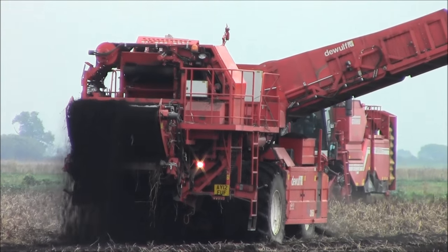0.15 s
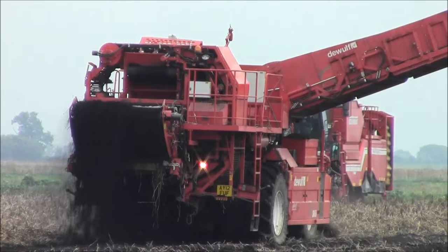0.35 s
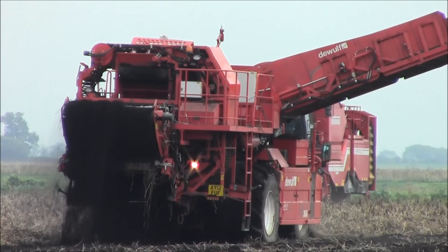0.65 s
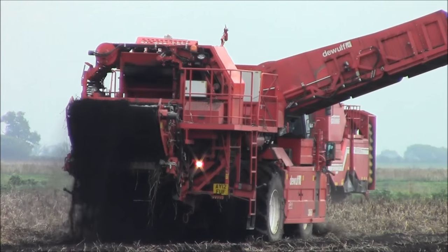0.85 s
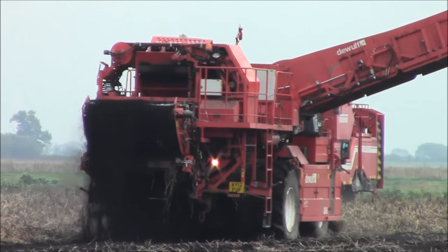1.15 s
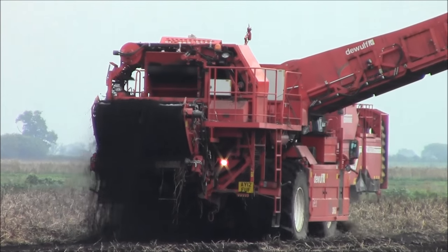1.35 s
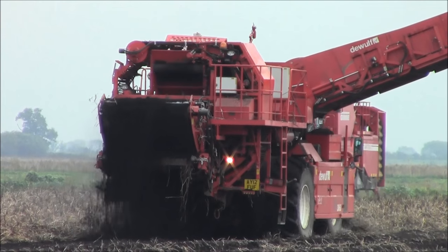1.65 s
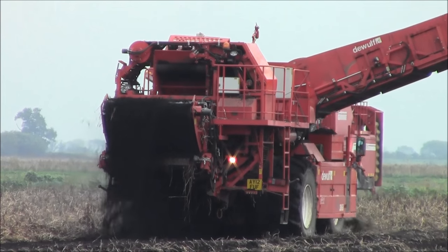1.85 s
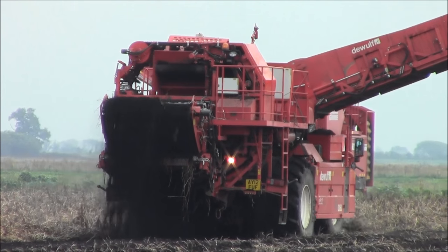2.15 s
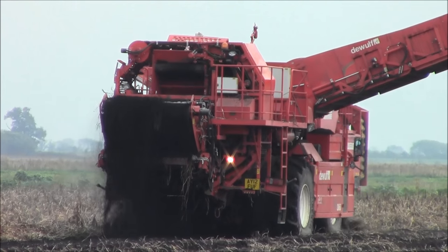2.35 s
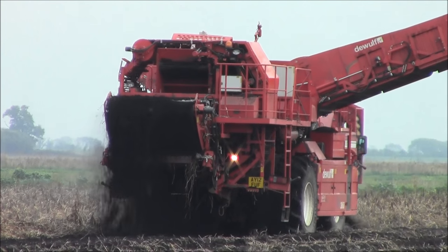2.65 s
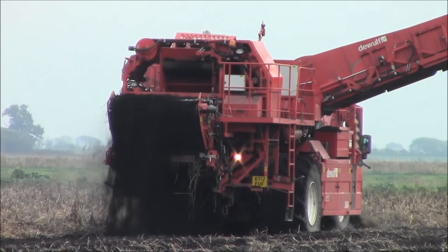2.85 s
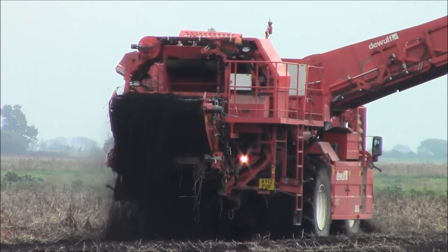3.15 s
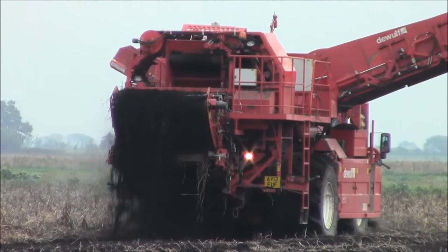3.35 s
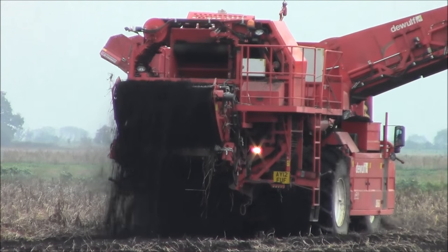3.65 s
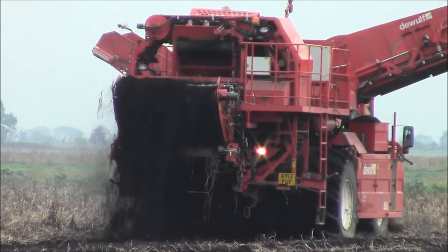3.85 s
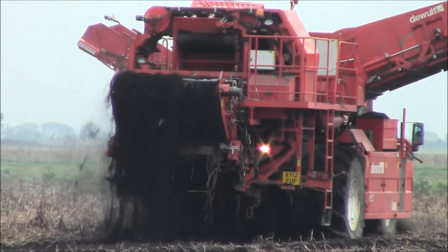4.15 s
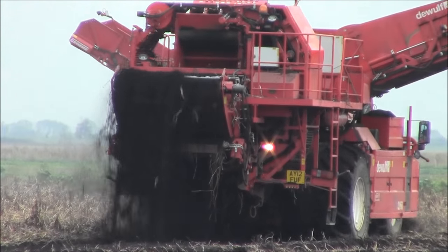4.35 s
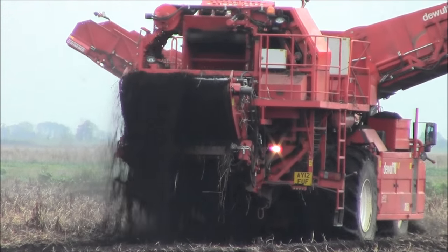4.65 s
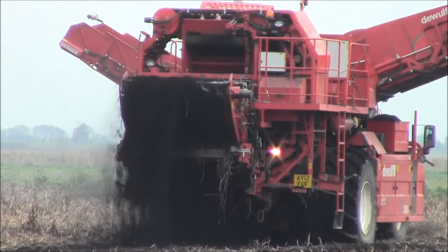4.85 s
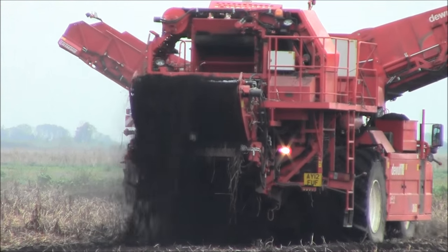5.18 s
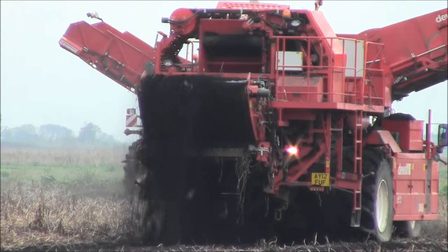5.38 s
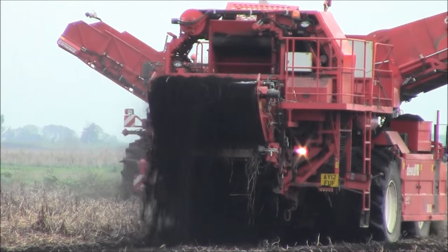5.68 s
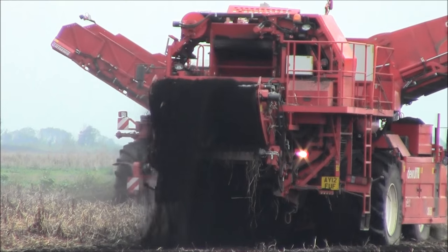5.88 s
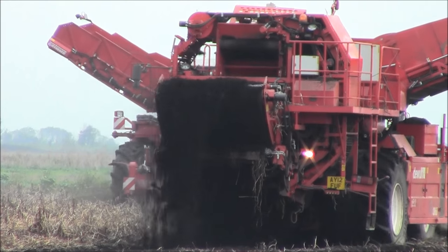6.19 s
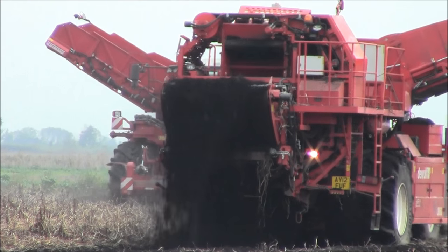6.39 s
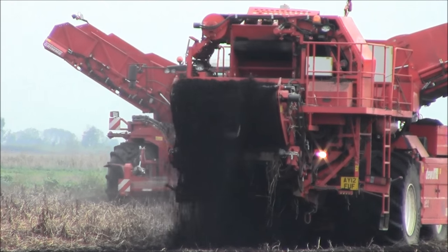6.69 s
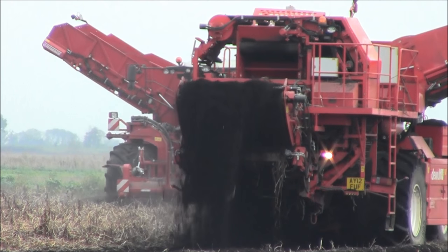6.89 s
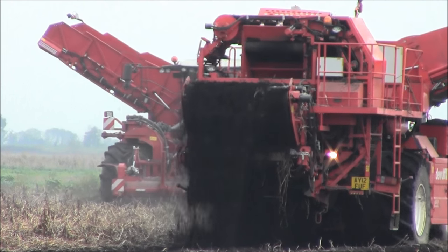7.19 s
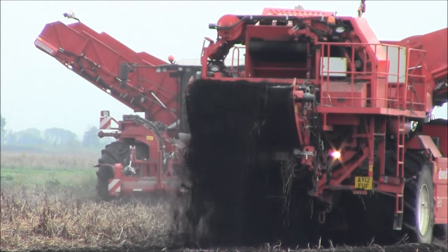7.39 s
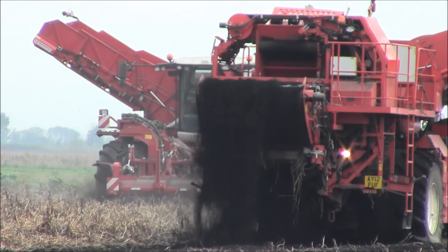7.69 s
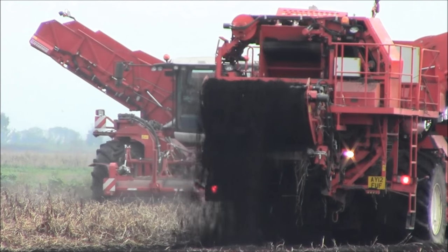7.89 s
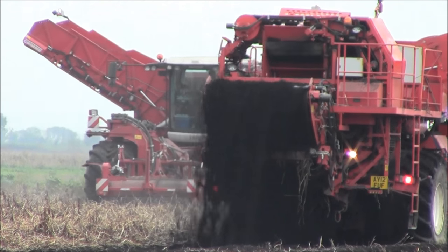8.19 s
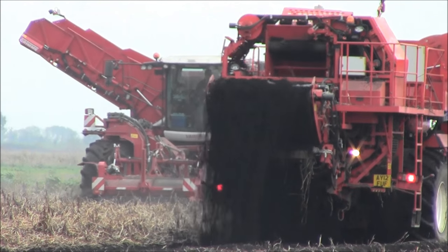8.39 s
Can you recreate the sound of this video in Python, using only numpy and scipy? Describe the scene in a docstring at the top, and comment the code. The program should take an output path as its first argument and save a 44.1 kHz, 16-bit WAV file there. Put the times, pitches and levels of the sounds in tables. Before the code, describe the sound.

Loud low diesel drone fluttering with a second engine, over dense metallic conveyor clatter and hissing soil; one sharp close click ducks everything late on.

```python
"""A field where two potato harvesters work, the near one crawling away. Its six-cylinder diesel drones as a stack
of sines and beats against the farther one; hydraulics and a shaft hum beneath. Shaped noise makes the exhaust
rumble, clattering sieve webs, a ringing steel panel, hissing soil and a squealing belt. Light ticks ring small
modes; one sharp click right at the microphone makes the limiter duck, and the level swells back at 2 dB per second.
Microphone hiss, a thin motor whine and a whistle lie under it all."""
import sys
import numpy as np
from scipy import signal
from scipy.fft import rfft, irfft, next_fast_len
from scipy.io import wavfile
from scipy.ndimage import uniform_filter1d

SR = 44100
rng = np.random.default_rng(int(sys.argv[2]) if len(sys.argv) > 2 else 0)


def waveform_to_disk(signal):
    """Save audio, clipped to [-1, 1], as 16-bit WAV at the path in sys.argv[1]."""
    frames = np.transpose(np.atleast_2d(signal))
    scaled = np.clip(frames, -1, 1) * 32767
    samples = np.round(scaled).astype(np.int16)
    wavfile.write(sys.argv[1], SR, samples)


N = 376173

# Stereo likeness of all coloured noise. Each row: frequency in Hz, left-right correlation from 0 to 1.
LIKENESS = [(30, 0.88), (90, 1), (200, 0.61), (400, 0.63), (900, 0.58), (1600, 0.765), (2400, 0.94),
            (3500, 0.86), (5000, 0.57), (8000, 0.51), (14000, 0.47)]

# Near diesel's firing tone and its partials. Each row: multiple of the firing rate, relative level in dB.
NEAR_ORDERS = [(1 / 2, -37.5), (2 / 3, -28), (1, 0), (4 / 3, -37), (3 / 2, -26.5), (2, -14), (5 / 2, -37),
               (3, -41.5)]
# A load pulls the near engine down. Each row: middle in seconds, length in seconds, sag in Hz.
ENGINE_LOAD = [(8.15, 1.145, 2.58)]
# The farther drone fades now and then. Each row: middle in seconds, length in seconds, depth in dB.
FAR_FADES = [(.3, .9, 4), (1.88, .5, 8), (2.6, 0.65, 8), (3.95, 1.2, 15), (5.73, 0.42, 10), (8.42, .7, 5)]
NEAR_HZ, NEAR_WAVER_HZ = 92.93, 0.11
NEAR_START_DB, RECEDE_DB_PER_S = -10, 0.2563
FAR_HZ, FAR_DB = 80.2, -26.5

# Colour of the exhaust rumble. Each row: frequency in Hz, relative level in dB.
RUMBLE_COLOUR = [(12, -18.5), (24, -17), (38, -5.5), (60, -4.5), (100, -1.5), (135, -3.5), (165, 2),
                 (200, 3), (240, -9.5), (285, -9), (320, -23.5), (450, -44), (1500, -79)]
# Its stereo lean. Each row: frequency in Hz, left minus right in dB.
RUMBLE_BALANCE = [(30, 1), (150, 2.9), (280, .3)]
RUMBLE_START_DB = -26

# Effort of the hydraulic drive, heard as its hum. Each row: time in seconds, level in dB.
DRIVE_EFFORT = [(0, -31.5), (.2, -31.5), (.5, -37), (1.2, -42), (1.65, -39), (2.1, -47.5), (3, -50),
                (4.1, -40.5), (5.3, -56), (7.3, -47), (8.53, -52)]
# Colour of the oil rush. Each row: frequency in Hz, relative level in dB.
OIL_COLOUR = [(150, -20.5), (260, -1), (400, -5.5), (700, -14.5), (1100, -6.5), (1500, -25), (5000, -60)]
DRIVE_START_HZ, DRIVE_CREEP_HZ_PER_S = 100.8, .3
# the overtone comes up under strain: dB at full effort, dB per dB of effort
OVERTONE_DB, OVERTONE_FOLLOWS = -37, 3.0

SHAFT_HZ, SHAFT_START_DB, SHAFT_FADE_DB_PER_S = 338.7, -47.5, 1.4

# Load on the sieve webs, heard as their clatter. Each row: time in seconds, level in dB.
WEB_LOAD = [(0, -33), (1.2, -35), (1.95, -33.5), (2.5, -35.5), (3.8, -35.6), (4.8, -34.5), (7, -35.2),
            (8.2, -33.5), (8.53, -33.5)]
# Colour of the clatter. Each row: frequency in Hz, relative level in dB.
CLATTER_COLOUR = [(200, -13), (340, -3.5), (480, 0.5), (680, -1), (870, 1), (1050, -2), (1220, -4),
                  (1450, -4.5), (1850, -4.5), (2110, -1), (2290, -11.5), (2600, -7.5), (4000, -43),
                  (9000, -49.5)]
# Its stereo lean. Each row: frequency in Hz, left minus right in dB.
CLATTER_BALANCE = [(300, 2.0), (800, 2.0), (1200, -1.0), (1850, -1.0), (2200, 1.0)]
# Colour of the ringing panel. Each row: frequency in Hz, relative level in dB.
PANEL_COLOUR = [(1250, -24.0), (1460, -7.5), (1550, -2.5), (1610, -3), (1690, -8.5), (1800, -21),
                (2400, -40), (6000, -80)]
# the panel rings with the clatter: mean dB, dB per dB of load
PANEL_DB, PANEL_FOLLOWS = -41.4, 1.2

# Flow of soil over the webs, heard as its hiss. Each row: time in seconds, level in dB.
SOIL_FLOW = [(0, -31.5), (.5, -35), (2.05, -35.5), (2.4, -34), (3.2, -33.8), (4.8, -35), (5.6, -38.5),
             (7, -37.5), (8.3, -35.5), (8.53, -35)]
# Colour of the hiss. Each row: frequency in Hz, relative level in dB.
SOIL_COLOUR = [(1800, -19.5), (2450, -7.5), (2750, -5.5), (3020, -.5), (3250, -2.5), (3650, -1), (3970, -1),
               (4300, -5), (4930, -7.5), (5400, -10.5), (5800, -17), (6300, -17.5), (7000, -27.5),
               (14000, -32)]
# Its stereo lean. Each row: frequency in Hz, left minus right in dB.
SOIL_BALANCE = [(2400, -1), (3300, -.5), (4100, -0.5), (4350, -4), (4750, -1), (5000, 0), (6000, 0.5)]

# Fits of belt rubbing. Each row: start in seconds, length in seconds, pitch in Hz, glide in Hz per second,
# level in dB.
RUBS = [(0, .2, 3960, -800, -33), (.2, 0.45, 3950, -400, -41.5), (.8, 0.28, 3910, 299, -39),
        (1.253, .2, 3950, 0, -39), (1.46, 0.18, 3480, 999, -39), (2.28, .2, 3600, 1200, -37),
        (2.999, 0.5, 4020, -200, -39), (3.42, 0.14, 3580, 0, -38), (4.028, 0.21, 3920, 0, -37.5),
        (4.2, 0.25, 3500, 0, -40), (4.5, 0.63, 3870, -50, -44.5), (8.18, 0.17, 3930, 0, -39)]
# Rasp pitched above the squeal. Each row: time in seconds, level in dB.
RASP = [(0, -41.5), (1.3, -42), (2.2, -43.5), (2.8, -52), (4.1, -50), (5.5, -59), (7.2, -53), (8.53, -46)]
RUB_ATTACK_S, RUB_RELEASE_S = 0.042, 0.13

# Colour of the microphone hiss. Each row: frequency in Hz, relative level in dB.
MIC_HISS_COLOUR = [(1000, -0.5), (6000, 9), (8000, 7), (10000, 3.5), (13000, 1.5), (16000, -10)]
# Thin whine of a small motor. Each row: pitch in Hz, level in dB, left minus right in dB.
MOTOR_WHINE = [(6610, -63, 8), (8600, -78, -1)]
# The whistle swells at times. Each row: middle in seconds, length in seconds, rise in dB.
WHISTLE_SWELLS = [(1.1, .6, 8), (2.1, .9, 12), (8.5, .5, 9)]
WHISTLE_HZ, WHISTLE_REST_DB = 8091, -73

# Light ticks and clanks. Each row: time in seconds, strength in dB before the trim, brightness in dB per octave.
TICKS = [(2.42, -28, 11), (2.70, -24, 11), (2.899, -18.5, 11), (2.902, -19, 10), (2.9213, -15.5, 9),
         (2.925, -17, 1), (4.5922, -13.5, -2), (4.6483, -20, 14), (4.773, -16, 1.5), (4.9525, -18, 0),
         (5.3525, -15, -2), (5.5725, -18, 2), (5.752, -18, 0), (6.0325, -15, 0), (6.293, -17, -2),
         (6.4725, -21, 0), (6.6527, -15.5, 0), (7.013, -11, -4), (7.075, -20.5, 0), (7.293, -17, -2),
         (8.2735, -20, 3)]
# Modes of the small part they ring. Each row: frequency in Hz, relative level in dB, 60 dB decay in seconds.
TICK_MODES = [(1750, 1, 0.01), (1980, 2, 0.0099), (2190, -1, 0.011), (2922.5, -11.5, 0.0054),
              (3350, -10, .007), (4150, -13, 0.0065)]
TICK_TRIM_DB = -3.5
# fainter ticks fall within this span, at least this strong before the trim
FAINT_FROM_S, FAINT_TO_S, FAINT_DB = 4.5, 7.8, -26

# Three contacts of the close click, two milliseconds in all. Each row: time in seconds, strength in dB
# before the trim, brightness in dB per octave.
CLICK_CONTACTS = [(6.4295, -5.5, 4), (6.4303, -11, -4), (6.4314, 1, -0.5)]
# Modes the click rings. Each row: frequency in Hz, relative level in dB, 60 dB decay in seconds.
CLICK_MODES = [(620, -19, .012), (870, -18, 0.019), (1601, -0.5, 0.016), (2120, -2, 0.0068),
               (2615, -4, 0.0078), (3020, -9, 0.011), (3750, -11.5, 0.0077), (4920, -4.5, 0.008),
               (5360, -11, 0.0062), (6530, -12.5, 0.0039), (9900, -32, 0.0025)]
CLICK_TRIM_DB = -3

CUTOFF_HZ = 15800


def seconds():
    """Time at every sample."""
    return np.arange(N) / SR


def from_db(db):
    """Decibels to gain."""
    return 10 ** (np.asarray(db) / 20)


def rms_one(x):
    """Scale to rms 1."""
    return x / np.sqrt(np.mean(x ** 2) + 1e-20)


def in_time(rows):
    """Each column of a curve at every sample."""
    s, *columns = np.transpose(rows)
    return [np.interp(seconds(), s, column) for column in columns]


def at_hz(points, hz):
    """Read a spectrum on a log-frequency axis."""
    point_hz, value = np.transpose(points)
    return np.interp(np.log(np.maximum(hz, 1)), np.log(point_hz), value)


def pan(balance_db):
    """Left and right gains for a level difference, positive to the left."""
    return from_db(np.array([[.5], [-.5]]) * balance_db)


def angle(per_s):
    """Angle in radians of something turning at this rate."""
    return 2 * np.pi * np.cumsum(per_s) / SR


def swells(rows):
    """Smooth bumps, each with a middle, a length and a height."""
    total = 0
    for middle, length, height in rows:
        phase = np.pi * np.clip((seconds() - middle) / length, -.5, .5)
        total = total + height * np.cos(phase) ** 2
    return total


def drift(rate):
    """Slow random wandering with spread 1; a higher rate in Hz wanders faster."""
    step = 40  # samples between the slow points
    r = np.exp(-2 * np.pi * rate * step / SR)
    noise = rng.standard_normal(N // step + 2002)
    slow = signal.lfilter([1], [1, -2 * r, r * r], noise)[2000:]  # drop the filter's start-up
    return np.interp(np.arange(N) / step, np.arange(len(slow)), rms_one(slow))


def coloured(spectrum, drive=1, balance=((1000, 0),), lag_s=0):
    """Stereo noise, swelling with the drive, in a given colour and width; the left may lag; rms 1."""
    size = next_fast_len(N)
    hz = np.arange(size // 2 + 1) * SR / size
    mid, side = rfft(rng.standard_normal((2, N)) * drive, size)
    alike = np.clip(at_hz(LIKENESS, hz), 0, 1)
    ears = np.sqrt(1 + alike) * mid + np.sqrt(1 - alike) * side * [[1], [-1]]
    ears[0] *= np.exp(-2j * np.pi * hz * lag_s)
    shaped = ears * from_db(at_hz(spectrum, hz)) * pan(at_hz(balance, hz))
    return rms_one(irfft(shaped, size)[:, :N])


def knocks(per_s, spread_db, fade_s):
    """Amplitude envelope of many small random collisions, each with decaying power; rms 1."""
    strength = from_db(spread_db * np.clip(rng.standard_normal(N), -2, 2))
    power = (rng.random(N) < per_s / SR) * strength ** 2
    return rms_one(np.sqrt(signal.lfilter([1], [1, -np.exp(-1 / (fade_s * SR))], power + 1e-12)))


def squeal(hz, width_hz):
    """A narrow, restless band of sound that follows a pitch; rms 1."""
    lowpass = signal.butter(2, width_hz / 2, fs=SR, output="sos")
    narrow = signal.sosfilt(lowpass, rng.standard_normal((2, N)))
    turn = angle(hz)
    return rms_one(narrow[0] * np.cos(turn) + narrow[1] * np.sin(turn))


def diesels(firing, near_db):
    """The silencers leave nearly pure firing tones; the two engines beat nearly thirteen times a second."""
    near = 0
    for order, order_db in NEAR_ORDERS:
        waver_db = .12 if order == 1 else .8
        near = near + from_db(order_db + waver_db * drift(3.6)) * np.cos(order * firing)
    far_turn = angle(FAR_HZ + 0.15 * drift(1.7))
    far = from_db(FAR_DB - swells(FAR_FADES)) * np.cos(far_turn)
    return np.sqrt(2) * (from_db(near_db) * near + far) * pan(2.04)


def exhaust_rumble(receding_db):
    """Low turbulent noise from the exhaust, sinking as the machine crawls away."""
    level_db = RUMBLE_START_DB + receding_db + .5 * drift(2.8)
    return from_db(level_db) * coloured(RUMBLE_COLOUR, balance=RUMBLE_BALANCE)


def hydraulics():
    """The third and fourth harmonics of the drive hum over its oil rush; all three follow its effort."""
    effort_db, = in_time(DRIVE_EFFORT)
    overtone_db = OVERTONE_DB + OVERTONE_FOLLOWS * (effort_db - effort_db.max())
    drive_hz = DRIVE_START_HZ + DRIVE_CREEP_HZ_PER_S * seconds()
    turn = angle(drive_hz * (1 + 0.0015 * drift(3.4)))
    hum = from_db(effort_db) * np.cos(3 * turn) + from_db(overtone_db) * np.cos(4 * turn)
    rush = from_db(effort_db / 2 - 21.5) * coloured(OIL_COLOUR)
    return np.sqrt(2) * hum * from_db(0.97 * drift(2.6)) * pan(1.0) + rush


def shaft():
    """A faint turning-shaft hum, a wavering sine that fades with distance."""
    level_db = SHAFT_START_DB - SHAFT_FADE_DB_PER_S * seconds() + 1.1 * drift(1.2)
    return np.sqrt(2) * from_db(level_db) * np.sin(angle(SHAFT_HZ + 1.213 * drift(0.58)))


def webs():
    """Rods and clods knock densely on the sieve webs and keep a steel panel ringing and singing."""
    clatter_db = in_time(WEB_LOAD)[0] + .3 * drift(2.3)
    panel_db = PANEL_DB + PANEL_FOLLOWS * (clatter_db - clatter_db.mean()) + .5 * drift(3.0)
    web_knocks = knocks(per_s=2000, spread_db=1, fade_s=0.0041)
    rattle = coloured(CLATTER_COLOUR, drive=web_knocks, balance=CLATTER_BALANCE, lag_s=.00005)
    panel_knocks = knocks(per_s=700, spread_db=3.0, fade_s=0.0033)
    panel = coloured(PANEL_COLOUR, drive=panel_knocks)
    song = squeal(1595 + 22 * drift(6.95), width_hz=80)
    ringing = panel + from_db(-5.5) * song
    return from_db(clatter_db) * rattle + from_db(panel_db) * ringing * pan(-9)


def soil(firing):
    """Soil and haulm hiss over the steel, mixed with engine clatter that pulses with the firing."""
    hiss_db = in_time(SOIL_FLOW)[0] + .5 * drift(8.6)
    pulse = 1 + 0.095 * np.cos(firing) + 0.062 * np.cos(firing / 2)
    grains = knocks(per_s=3500, spread_db=3.0, fade_s=0.0024)
    hiss = coloured(SOIL_COLOUR, drive=pulse * grains, balance=SOIL_BALANCE, lag_s=.000015)
    return from_db(hiss_db) * hiss


def belt():
    """Rubbing comes in fits: a rough, sliding squeal with a broader rasp above it, further to the right."""
    t, tone = seconds(), 0
    waver_hz = 25 * drift(8)
    for start, length, hz, glide, level_db in RUBS:
        attack = (t - start) / RUB_ATTACK_S
        release = (start + length - t) / RUB_RELEASE_S + .5  # half let go at the end of the fit
        grip = np.clip(np.minimum(attack, release), 0, 1)
        pitch = hz + glide * np.clip(t - start, 0, length) + waver_hz
        tone = tone + from_db(level_db) * grip * squeal(pitch, width_hz=340)
    rasp_db = in_time(RASP)[0] + 1.9 * drift(12)
    rasp = from_db(rasp_db) * squeal(4820 + 110 * drift(5), width_hz=540)
    return tone * from_db(1.9 * drift(14)) * pan(-1.5) + rasp * pan(-2.5)


def microphone_hiss():
    """Steady electrical noise of the microphone."""
    return from_db(-51.5) * coloured(MIC_HISS_COLOUR)


def motor_whine():
    """A small motor's thin whine: high sines, wavering a little in pitch and level."""
    whine = 0
    for hz, level_db, balance_db in MOTOR_WHINE:
        tone = np.sin(angle(hz + 1.5 * drift(10)))
        whine = whine + from_db(level_db + drift(2)) * tone * pan(balance_db)
    return np.sqrt(2) * whine


def whistle():
    """A thin high sine that swells at times."""
    level_db = WHISTLE_REST_DB + swells(WHISTLE_SWELLS) + 2.0 * drift(6)
    return np.sqrt(2) * from_db(level_db) * np.sin(angle(WHISTLE_HZ + 2.0 * drift(10))) * pan(-3.5)


def ring(clicks, hz, t60):
    """A unit click sets a decaying sine ringing from height 1."""
    r, w = from_db(-60 / (t60 * SR)), 2 * np.pi * hz / SR
    return signal.lfilter([0, np.sin(w)], [1, -2 * r * np.cos(w), r * r], clicks + 1e-18)


def strike(hits, modes, vary_db):
    """Every hit rings each mode with a strength of its own; bright hits favour the modes above 2 kHz."""
    s, hit_db, bright_db = np.transpose(hits)
    chance, out = rng.standard_normal((len(hits), len(modes))), np.zeros(N)
    for k, (hz, mode_db, t60) in enumerate(modes):
        clicks = np.zeros(N)
        tilt_db = bright_db * np.log2(hz / 2000)
        clicks[(s * SR).astype(int)] = from_db(hit_db + mode_db + tilt_db + vary_db * chance[:, k])
        out += ring(clicks, hz, t60) * (-1) ** k  # neighbouring modes start in opposite directions
    return out


def ticking():
    """The clear ticks and a scatter of faint ones ring the same small part."""
    faint = []
    for when, force in rng.random(size=(14, 2)):
        faint.append((FAINT_FROM_S + when * (FAINT_TO_S - FAINT_FROM_S), FAINT_DB + 4 * force, 0))
    return from_db(TICK_TRIM_DB) * strike(TICKS + faint, TICK_MODES, vary_db=1.5) * pan(-1.3)


def close_click():
    """Three quick hard contacts right at the microphone ring a set of short modes."""
    return from_db(CLICK_TRIM_DB) * strike(CLICK_CONTACTS, CLICK_MODES, vary_db=1.7) * pan(0.97)


def scene():
    """Engines, machinery, ticks, the close click and the thin sounds beneath."""
    receding_db = -RECEDE_DB_PER_S * seconds()
    firing = angle(NEAR_HZ + NEAR_WAVER_HZ * drift(1.23) - swells(ENGINE_LOAD))
    engines = diesels(firing, NEAR_START_DB + receding_db) + exhaust_rumble(receding_db)
    drone = engines + hydraulics() + shaft()
    digging = webs() + soil(firing) + belt()
    thin = microphone_hiss() + motor_whine() + whistle()
    return drone + digging + thin + ticking() + close_click()


def limiter(x, ceiling_db, most_db, release_db_per_s, ahead_s):
    """Looks ahead, ducks under a peak and recovers slowly."""
    level_db = 20 * np.log10(np.abs(x).max(axis=0) + 1e-9)
    over = np.clip(level_db - ceiling_db, 0, most_db)
    ramp = release_db_per_s * seconds()
    held = np.maximum.accumulate(over + ramp) - ramp  # each peak's duck shrinks at the release rate
    early = np.interp(np.arange(N) + ahead_s * SR, np.arange(N), held)
    return x * from_db(-uniform_filter1d(early, size=800))


def record(dry):
    """Limiter, full-scale stop, soft ends and a steep top cut."""
    ducked = limiter(dry, ceiling_db=-1.23, most_db=6.5, release_db_per_s=2.0, ahead_s=0.024)
    limited = np.clip(ducked, -1, 1)
    ends = np.clip(np.minimum(np.arange(N), np.arange(N)[::-1]) / (.002 * SR), 0, 1)
    top_cut = signal.ellip(14, .1, 80, CUTOFF_HZ, fs=SR, output="sos")
    return signal.sosfilt(top_cut, limited * ends)


dry = scene()
out = record(dry)
waveform_to_disk(out)
```